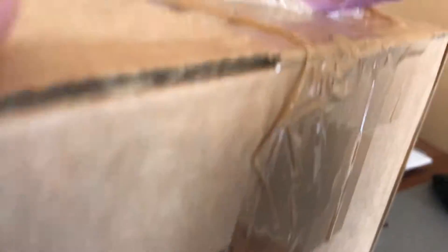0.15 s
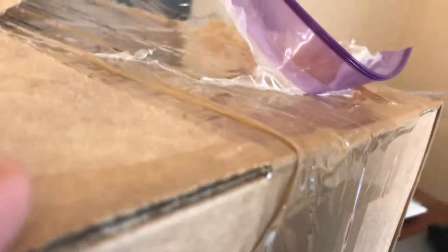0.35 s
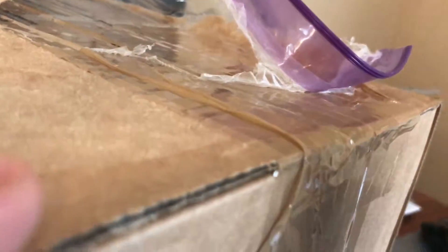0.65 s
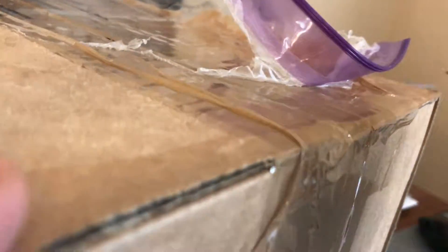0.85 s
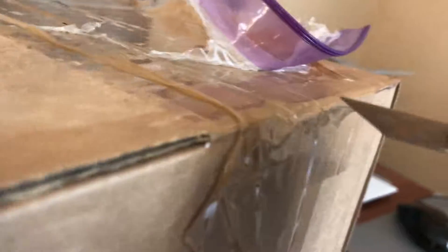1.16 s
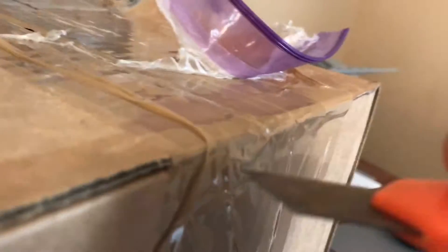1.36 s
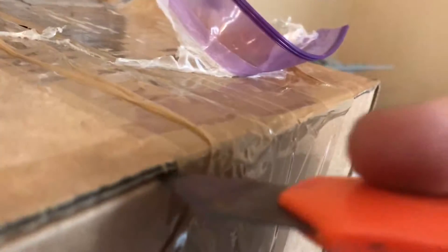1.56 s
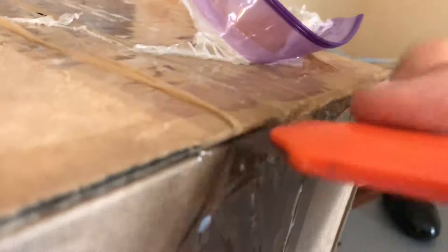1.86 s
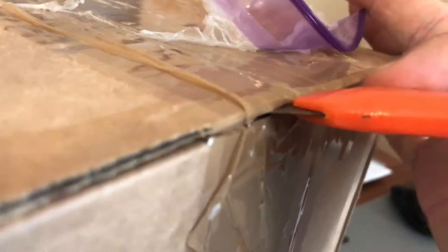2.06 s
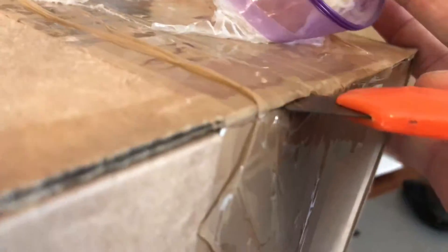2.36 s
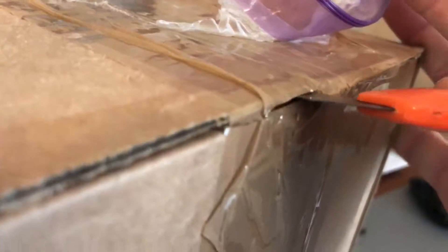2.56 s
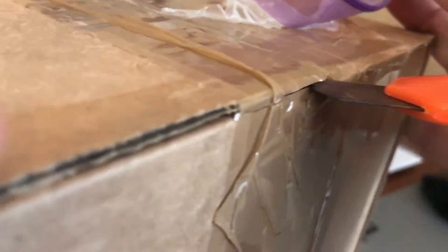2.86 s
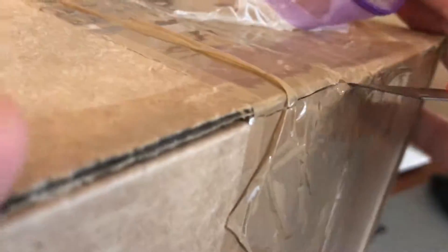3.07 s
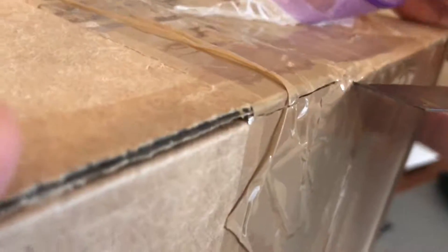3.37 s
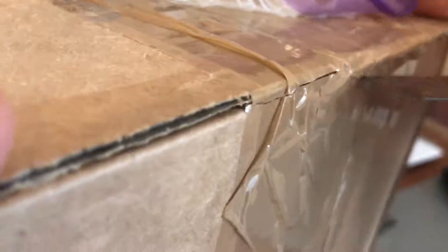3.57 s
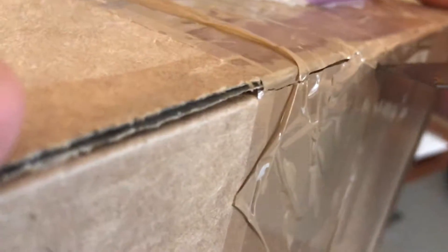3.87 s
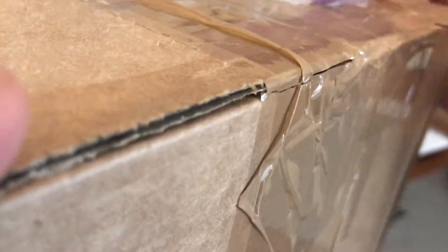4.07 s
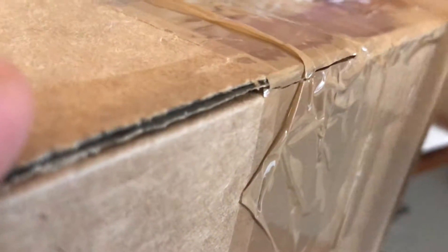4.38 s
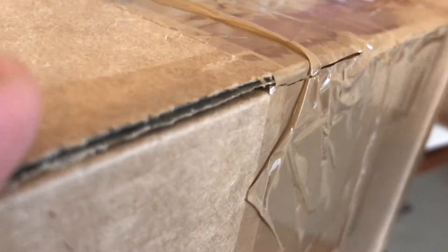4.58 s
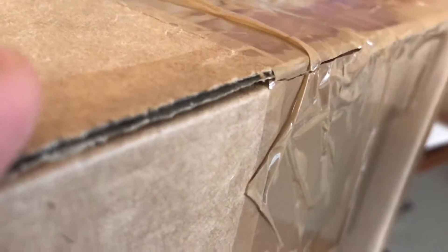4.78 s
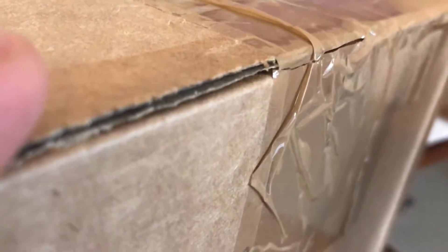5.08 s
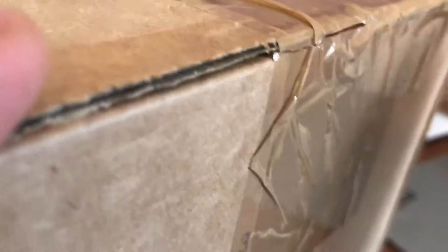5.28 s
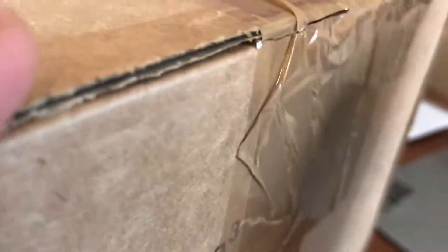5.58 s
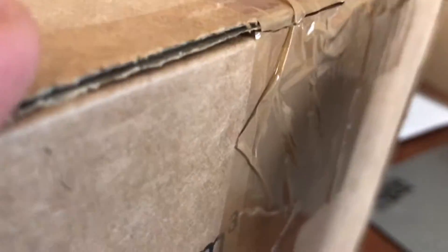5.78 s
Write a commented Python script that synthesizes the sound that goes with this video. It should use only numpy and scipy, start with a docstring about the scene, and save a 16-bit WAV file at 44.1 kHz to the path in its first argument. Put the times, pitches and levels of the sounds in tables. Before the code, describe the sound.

Close to the microphone in a small room, faint handling and light knife clicks lead into a blade slitting tape on a cardboard box. The cut goes in uneven scraping strokes, with short rips and low knocks, up to a loud crack. The blade retracts with a brief plastic rattle and a sharp click. Finally fingers rub the box and pick at the tape, making crackles and dull bumps.

```python
"""A utility knife slits the packing tape on a cardboard box, close by in a small room.
First the plastic slider clicks, each impact ringing the modes of the handle. The blade then rubs, rips
and snaps through the film by stick-slip friction, and the panels and the enclosed air resonate with it.
Near 4.4 s the slider scrapes back and strikes its stop. Last, a hand shifts the box and picks at the tape."""
import sys
import numpy as np
from scipy import signal
from scipy.fft import rfft, irfft
from scipy.io import wavfile
from scipy.ndimage import uniform_filter1d

SR = 44100
rng = np.random.default_rng(int(sys.argv[2]) if len(sys.argv) > 2 else 0)


def unload_audio(sound):
    """Save the sound as a 16-bit wav file, at the path given as the first command line argument."""
    columns = np.transpose(np.atleast_2d(sound))
    # keep every value between -1 and 1, then stretch to whole-number steps
    steps = np.round(np.clip(columns, -1, 1) * 32767)
    wavfile.write(sys.argv[1], SR, steps.astype(np.int16))


N = 261513
T = np.arange(N) / SR

# Normal modes. Each row: frequency in Hz, bandwidth in Hz, relative level in dB.
CAVITY_MODES = [(125.75, 6.04, 7), (225, 33, -9), (254, 34, -5.5), (287, 20, 1), (359, 26, -19)]  # air inside the box
PANEL_MODES = [(264.4, 46, 5), (354.5, 45, 5), (490, 130, -5.5), (578.4, 119, 3.5), (686, 186, -0.5),
               (864, 100, 0), (1050, 43, 2), (1112, 137, -1.5), (1332, 66, -2.5), (1544, 168, -0.5),
               (1860, 100, -10.5), (2160, 150, -7), (2286, 73, -18.5), (3050, 1500, -14.5)]  # cardboard panels
HANDLE_MODES = [(1307, 350, -14.5), (1723, 900, 1), (2105, 290, -1), (2580, 130, -4.5), (3574, 180, 3),
                (3710, 540, -9.5), (4305, 420, 1), (6270, 2600, -6.5), (6470, 750, -8), (7820, 730, -7.5),
                (9250, 510, -5), (11600, 720, -17.5), (11880, 880, -11)]  # hollow plastic handle
CATCH_MODES = [(2210, 310, -7), (3510, 210, -5.5), (3790, 440, -1), (4590, 210, 2), (5040, 300, 1.5),
               (5754, 160, 8.5), (6330, 200, -3), (7200, 200, -4), (7850, 150, -21), (9800, 120, -10.5),
               (11400, 280, -6), (12220, 240, -11), (13500, 220, -9), (14620, 300, -16)]  # spring catch of the slider
# Spectrum of breaking film. Each row: frequency in Hz, relative level in dB.
FILM_SPECTRUM = [(300, -12), (900, 3.5), (1600, 4), (2800, 1.5), (4200, 1), (6000, 1.5), (8000, -1),
                 (11000, -1.5), (16000, -4.5)]


def ripping(falloff_db_per_octave=5):
    """Fracture: the film tears in a dense run of slips that swells with the pull and drives the panels."""
    # Each row: start, swell and fade in seconds, film and panel levels in dB, favoured frequency in Hz.
    rips = [(1.785, 0.025, 0.014, -49, -48, 1040), (1.936, 0.0042, 0.043, -34.5, -37, 1000),
            (1.958, 0.019, 0.022, -52, -39.5, 593), (3.653, 0.0042, 0.0063, -36, -24.5, 553),
            (3.711, 0.0041, 0.0065, -42.5, -33, 640), (3.718, .03, 0.017, -43.5, -50, 440),
            (5.037, 0.025, 0.048, -55, -52.5, 930), (5.153, 0.015, 0.034, -49.5, -51.5, 660),
            (5.447, 0.016, 0.019, -40, -36, 794), (5.551, 0.033, 0.017, -46, -50, 1080),
            (5.636, 0.0044, 0.02, -46, -44.5, 605), (5.684, 0.0046, 0.036, -35, -39, 1100),
            (5.708, 0.028, 0.02, -52, -46, 810)]
    out = np.zeros(N)
    for start, swell, fade, film_db, panel_db, spot_hz in rips:
        n = int((swell + fade) * SR)
        pull = np.interp(T[:n], [0, swell, swell + fade], [.4, 1.25, .2])
        tear = slips(n, rate=12000, spread_db=4.5) * pull * undb(2.6 * walk(n, rate=240))
        tear = np.pad(tear, (0, SR // 10))
        fill = np.sqrt(n / len(tear))  # the levels hold for the run, not for its ring-out
        # a stiff edge favours the high panel modes, a slack face the low ones
        modes = [(hz, width, db - falloff_db_per_octave * abs(np.log2(hz / spot_hz)))
                 for hz, width, db in PANEL_MODES]
        panel = unit(ring(tear, touched(modes, spread_db=2.0, detune=0.055)))
        film = unit(colour(taut(tear), FILM_SPECTRUM))
        add(out, start, fill * (film * undb(film_db) + panel * undb(panel_db)))
    return out


def snapping():
    """Sudden release of tension: the tape parts with a bright crack, and the panel under it knocks."""
    # Each row: start in seconds, film level in dB, decay time in seconds, panel level in dB.
    snaps = [(0.69, -84, 0.011, -62), (1.1152, -57, 0.00028, -78), (1.176, -76, 0.0044, -60),
             (1.2038, -52.5, 0.0053, -49.5), (1.731, -55, 0.0017, -66), (1.9689, -36.5, 0.0091, -45),
             (2.0489, -37, 0.0015, -39.5), (2.0617, -38.5, 0.0005, -44), (2.3556, -44, 0.0059, -45),
             (3.336, -60.5, 0.0006, -74), (3.4897, -59.5, 0.0032, -54), (3.6031, -35, 0.0023, -44.5),
             (3.661, -23, 0.0037, -37.5), (3.7543, -40, 0.0026, -38), (3.766, -43.5, 0.0018, -60),
             (3.8927, -42.5, 0.0024, -54), (3.943, -48.5, 0.0045, -53), (4.0493, -42.5, 0.0031, -65.5),
             (4.0634, -40.5, 0.005, -49), (4.0842, -39, 0.0011, -47.5), (4.9291, -60, 0.0023, -76.5),
             (5.0136, -52.5, 0.0067, -52.5), (5.062, -44, 0.0083, -51), (5.0743, -41.5, 0.0052, -47),
             (5.39, -54, 0.0017, -50.5), (5.4673, -39.5, 0.0058, -42.5), (5.6634, -43.5, 0.0076, -42),
             (5.6883, -46, 0.0072, -28.5), (5.84, -53, 0.0034, -44)]
    out = np.zeros(N)
    for start, film_db, decay, panel_db in snaps:
        snap = crack(decay)
        film = impulse(colour(taut(snap), FILM_SPECTRUM, brightness_db(decay)))
        panel = impulse(ring(snap, PANEL_MODES))
        add(out, start, film * undb(film_db) + panel * undb(panel_db))
    return out


def taut(x):
    """Membrane resonance: tape stretched over the gap of the flaps adds its own short ring."""
    # Each row: frequency in Hz, bandwidth in Hz, relative level in dB.
    tape_modes = [(1840, 31, 2), (2397, 90, -2.5), (3200, 290, -10), (4075, 460, -5), (5280, 160, -15.5),
                  (5830, 130, -9), (6240, 230, -4.5), (6950, 270, -12), (8000, 100, -12),
                  (9060, 720, -11.5), (11160, 200, -1)]
    return x + undb(-0.5) * ring(x, tape_modes)


def knife_clacks(catch_db=-12, blade_db=-18):
    """Impact excitation: clicks and knocks from slider and blade ring the handle, catch and blade."""
    # Each row: start in seconds, handle level in dB, decay time in seconds.
    clacks = [(0.5555, -55, 0.0072), (0.569, -51.5, 0.0055), (0.591, -56, 0.0062), (0.886, -55, 0.00014),
              (0.9615, -51, 0.012), (1.6523, -40, 0.0016), (1.658, -34.5, 0.006), (1.719, -35, 0.0017),
              (3.6612, -25.5, 0.0017), (4.1119, -49.5, 0.0084), (4.2875, -44, 0.0042),
              (4.3056, -38.5, 0.0028), (4.3705, -37.5, 0.0049), (4.383, -45.5, 0.0041),
              (4.4067, -35, 0.002), (4.4203, -46, 0.0014), (4.4328, -41, 0.0056), (4.494, -43.5, 0.0053),
              (4.607, -47, 0.0096), (4.6371, -42, 0.0051), (4.6553, -42.5, 0.0031), (4.6984, -43, 0.0001),
              (4.7061, -43.5, 0.0015), (4.711, -37.5, 0.0052), (5.419, -51.5, 0.0012),
              (5.5487, -51, 0.0018), (5.8545, -36, 0.0014), (5.878, -35, 0.00092), (5.912, -49, 0.0016)]
    # Modes of the steel blade. Each row: frequency in Hz, bandwidth in Hz, relative level in dB.
    blade_modes = [(1806, 53, 2), (1810, 46, -12.5), (3306, 88, 7), (3696, 22, 0.5), (7400, 90, -12),
                   (8440, 110, -14), (10700, 150, -20.5)]
    # Touches on the blade itself. Each row: start in seconds, level in dB.
    pings = [(0.9605, -48.5), (1.719, -44), (1.8085, -47), (4.2889, -44), (4.5549, -48.5)]
    radiation = [(300, -43), (750, 0.5), (1200, -5.5), (11000, -2), (16000, 1)]  # too small for bass
    out = np.zeros(N)
    for start, db, decay in clacks:
        click = crack(decay)
        shell = impulse(ring(click, touched(HANDLE_MODES, spread_db=2.5, detune=0.036)))
        catch = impulse(ring(click, CATCH_MODES))
        blade = impulse(ring(click, blade_modes))
        handle = shell + undb(-12) * impulse(click) + undb(catch_db) * catch
        handle = impulse(colour(handle, radiation, tilt_db=brightness_db(decay) - 1))
        add(out, start, undb(db) * (handle + undb(blade_db) * blade))
    for start, db in pings:
        add(out, start, undb(db) * impulse(ring(crack(decay=0.0016), blade_modes)))
    return out


def slider():
    """Friction and rebound: the slider scrapes back along its track, and its catch bounces on the stop."""
    # The scrape. Each row: time in seconds, level in dB.
    track = [(4.27, -85.5), (4.31, -62.5), (4.35, -59), (4.419, -48), (4.53, -65), (4.72, -59), (4.83, -76)]
    # Hits on the stop. Each row: start in seconds, level in dB, decay time in seconds.
    bounces = [(4.3999, -24.5, 0.00037), (4.4015, -22, 0.00031), (4.4032, -32, 0.0009)]
    scrape_db = np.interp(T, *np.transpose(track), left=-140, right=-140)
    out = unit(ring(slips(N, rate=4800, spread_db=4.5), HANDLE_MODES)) * undb(scrape_db)
    for start, db, decay in bounces:
        click = crack(decay, rise=.0001)
        catch = impulse(ring(click, CATCH_MODES))
        contact = impulse(colour(click, FILM_SPECTRUM))
        add(out, start, undb(db) * (catch + undb(-24.5) * contact))
    return out


def thumping(boom_db_per_octave=10.5):
    """Damped oscillation: a released wall swings for a few cycles and excites the enclosed air."""
    # Each row: start in seconds, peak level of the flex in dB, its frequency in Hz.
    thumps = [(0.255, -44.5, 82.5), (1.208, -34, 92), (1.446, -50, 79), (1.807, -34.5, 109),
              (1.983, -24, 87.4), (2.011, -32, 88.5), (2.242, -37, 92), (2.336, -37.5, 129),
              (2.365, -35.5, 139), (2.67, -38.5, 117), (2.758, -40, 129), (2.944, -44.5, 94),
              (3.164, -35.5, 121), (3.195, -36, 99), (3.659, -21, 270), (3.661, -20.5, 105),
              (3.755, -32.5, 269), (3.759, -29, 109), (4.04, -42.5, 120), (4.079, -44.5, 98),
              (5.017, -38, 110), (5.187, -51, 122), (5.771, -48, 121), (5.433, -35, 122), (5.479, -40, 132),
              (5.693, -22, 87)]
    out = np.zeros(N)
    for start, db, hz in thumps:
        cycles = hz * T[:SR // 2]
        flex = np.sin(2 * np.pi * cycles) * (1 - np.exp(-cycles / 2.0)) * np.exp(-cycles / 0.81)
        # a stiffer wall lets go faster and reaches the higher modes
        boom = ring(np.exp(-cycles / 0.45), CAVITY_MODES)
        boom_db = -12 + boom_db_per_octave * np.log2(hz / CAVITY_MODES[0][0])
        thump = flex / np.abs(flex).max() + undb(boom_db) * boom / np.abs(boom).max()
        add(out, start, undb(db) * thump)
    return out


def effort(peak_fraction=0.42, arch_exponent=0.29, release_s=0.012):
    """Incoherent sources add in power: arched strokes over the grip give hiss, rasp and boom gains."""
    # Pressure of the hands on the box, heard as loudness. Each row: time in seconds, level in dB.
    grip = [(0.0, -81.5), (0.47, -76), (1.05, -86.5), (1.3, -75), (1.6, -77.5), (1.9, -67), (2.1, -65.5),
            (2.55, -68), (2.8, -68.5), (3.28, -74), (3.85, -62), (4.1, -67), (4.2, -88), (4.89, -93),
            (5.05, -84), (5.33, -70.5), (5.55, -62), (5.93, -63.5)]
    # Strokes of blade or fingers. Each row: start and length in seconds, hiss, rasp and boom in dB.
    strokes = [(0.08, 0.088, -69.5, -75, -82), (0.219, 0.24, -58, -68.5, -63.5),
               (0.587, 0.12, -57.5, -88, -74), (0.707, 0.14, -63, -84, -83), (0.848, 0.12, -59.5, -78, -80),
               (1.092, 0.15, -65.5, -86, -63), (1.194, 0.094, -56.5, -61.5, -59),
               (1.371, 0.053, -57.5, -66.5, -61), (1.633, 0.079, -54, -59.5, -63),
               (1.724, 0.095, -47, -53, -62), (1.997, 0.16, -57, -59, -46.5),
               (2.173, 0.11, -61.5, -58, -65), (2.272, 0.11, -54, -54, -51.5),
               (2.38, 0.07, -62, -62.5, -60), (2.566, 0.14, -62, -55.5, -69),
               (2.738, 0.022, -66, -54.5, -50), (2.833, 0.093, -61.5, -67, -76),
               (2.967, 0.1, -60.5, -48.5, -57), (3.082, 0.11, -58.5, -50.5, -61),
               (3.295, 0.035, -60, -61, -69), (3.418, 0.11, -85, -61, -56.5),
               (3.528, 0.047, -65, -62.5, -70), (3.66, 0.14, -56, -50.5, -42.5),
               (3.868, 0.068, -62, -61, -59), (4.012, 0.083, -58, -53.5, -42.5),
               (4.109, 0.71, -64, -70.5, -88.5), (4.917, 0.19, -66, -66, -73), (5.018, 0.14, -77, -57, -48),
               (5.142, 0.089, -68.5, -61.5, -43), (5.236, 0.057, -66.5, -80, -52),
               (5.368, 0.14, -77, -58.5, -48), (5.546, 0.081, -57.5, -53.5, -44),
               (5.7, 0.135, -54, -56, -44), (5.84, 0.08, -62, -53.5, -62)]
    rest_db = np.array([[0.5], [0], [9.5]])  # hiss, rasp and boom relative to the grip
    power = undb(np.interp(T, *np.transpose(grip)) + rest_db) ** 2
    for start, length, *levels_db in strokes:
        ramp = np.interp(T, start + length * np.array([0, peak_fraction, 1]), [0, 1, 0])
        arch = np.sin(np.pi / 2 * ramp) ** arch_exponent
        power += np.outer(undb(levels_db), arch) ** 2
    pole = np.exp(-2 / (release_s * SR))
    return np.sqrt(signal.lfilter([1 - pole], [1, -pole], power))


def sliding(hiss_gain, rasp_gain):
    """Sliding friction: steel and skin raise a hiss with lone ticks on the tape, a rasp in the panels."""
    # Each row: frequency in Hz, relative level in dB.
    hiss_spectrum = [(500, -7.5), (1500, 1), (2800, -2), (4500, -2.5), (7000, -2), (10500, -3),
                     (16000, -3.5)]
    grip_db = 1.3 * walk(N, rate=60)
    hiss = unit(shifting(colour(taut(slips(N, rate=9000, spread_db=2.5)), hiss_spectrum)))
    ticks = unit(colour(taut(slips(N, rate=160, spread_db=3.5)), hiss_spectrum, tilt_db=2))
    grit = slips(N, rate=3000, spread_db=1.5)
    scratch = colour(grit, [(500, -29), (1500, -0.5), (4500, 5.5), (16000, -8.5)])
    rasp = unit(ring(grit, PANEL_MODES) + undb(-26.5) * scratch)
    return undb(grip_db) * ((hiss + undb(-8.5) * ticks) * hiss_gain + rasp * rasp_gain)


def holding(boom_gain, skin_cutoff_hz=154, sway_db=-2):
    """Forced vibration: soft nudges of the hand sway the walls and keep the enclosed air booming."""
    # Modes of whole walls. Each row: frequency in Hz, bandwidth in Hz, relative level in dB.
    wall_modes = [(51.7, 16, -8), (80.3, 3.6, -7), (90.2, 5.2, -2.5)]
    push = butter(slips(N, rate=70, spread_db=0), skin_cutoff_hz)
    return boom_gain * (unit(ring(push, CAVITY_MODES)) + undb(sway_db) * unit(ring(push, wall_modes)))


def whirring():
    """Narrow-band noise: faint thin whirrs and rings come and go."""
    # Each row: start and end in seconds, frequency and bandwidth in Hz, level in dB.
    whirrs = [(0.073, 0.188, 4530, 290, -77), (0.866, 1, 3480, 110, -69), (0.907, 0.944, 3580, 250, -56.5),
              (1.271, 1.586, 1120, 131, -73.5), (1.453, 1.59, 4640, 200, -82), (1.79, 1.86, 3500, 200, -65),
              (2.865, 2.936, 2770, 900, -61), (2.96, 3.21, 4500, 300, -73), (2.963, 3.207, 6740, 250, -78)]
    out = np.zeros(N)
    for start, end, hz, width, db in whirrs:
        gate = np.clip(np.minimum(T - start, end - T) / 0.01, 0, 1)
        out += gate * undb(db) * unit(ring(rng.standard_normal(N), [(hz, width, 0)]))
    return out


def room(x, low_t60=0.34, high_t60=0.27, crossover_hz=2500, wet_db=-17):
    """Reverberation: the desk and near walls return a short tail whose treble dies first."""
    t = T[:SR // 2]
    noise = rng.standard_normal(len(t))
    low = butter(noise, crossover_hz) * 1000 ** (-t / low_t60)
    high = butter(noise, crossover_hz, "high") * 1000 ** (-t / high_t60)
    early = (1 - np.exp(-t / .003)) * (1 + 2.5 * np.exp(-t / .009))
    tail = colour((low + high) * early, [(100, 1.5), (6000, -0.5), (16000, -11.5)])
    return x + undb(wet_db) * signal.fftconvolve(x, tail / np.sqrt(np.sum(tail ** 2)))[:N]


def room_air():
    """Stationary noise: the faint air of the room, strongest in the bass."""
    # Each row: frequency in Hz, relative level in dB.
    air_spectrum = [(20, -3), (55, 7), (130, -2.5), (280, -1), (500, -11.5), (1000, -16), (2500, -21),
                    (6000, -23.5), (16000, -33)]
    return unit(colour(rng.standard_normal(N), air_spectrum)) * undb(-67)


def slips(n, rate, spread_db):
    """Stick-slip: tiny random releases, on average rate a second, a few far larger than the rest."""
    happens = rng.random(n) < rate / SR
    strength = np.minimum(rng.exponential(size=n), 5)
    return unit(happens * rng.standard_normal(n) * undb(spread_db * strength) + 1e-9)


def crack(decay, rise=0.00036, size=6144):
    """Transient excitation: a contact breaks in an exponentially fading burst of chatter."""
    t = T[:size]
    return rng.standard_normal(size) * (1 - np.exp(-t / rise)) * np.exp(-t / max(decay, 1e-4))


def brightness_db(decay, neutral_s=0.0022):
    """Time-frequency reciprocity: a shorter click is brighter; gives its tilt in dB an octave."""
    return 1.05 * np.log2(neutral_s / max(decay, 1e-4))


def ring(x, modes):
    """Modal superposition: x drives the resonances; a second, wider pass darkens the valleys between."""
    out = 0
    for hz, width, db in modes:
        mode = signal.lfilter(*signal.iirpeak(hz, hz / width, fs=SR), x)
        mode = signal.lfilter(*signal.iirpeak(hz, max(hz / width / 5, 1), fs=SR), mode)
        out = out + undb(db) * mode
    return out


def touched(modes, spread_db, detune):
    """Point of excitation: each contact lands elsewhere, so the modes vary in strength and pitch."""
    chance = rng.standard_normal((len(modes), 2))
    return [(hz * np.exp(detune * shift), width, db + spread_db * boost)
            for (hz, width, db), (shift, boost) in zip(modes, chance)]


def shifting(x, depth_db=2, rate=11, count=9):
    """Amplitude modulation: as the contact travels, its noise bands swell and fade independently."""
    spectrum, hz = rfft(x), np.fft.rfftfreq(N, 1 / SR)
    centres = np.geomspace(1000, 15000, count)
    bands = (irfft(spectrum * np.interp(hz, centres, weights), N) for weights in np.eye(count))
    return sum(band * undb(depth_db * walk(N, rate)) for band in bands)


def colour(x, points, tilt_db=0, size=2048):
    """Minimum-phase filter through (Hz, dB) points, tilted by tilt_db an octave from 1 to 16 kHz."""
    hz, db = np.transpose(points)
    octave = np.log2(np.maximum(np.fft.rfftfreq(size, 1 / SR), 1))
    slope = np.clip(octave - np.log2(4000), -2, 2)
    response = undb(np.interp(octave, np.log2(hz), db) + tilt_db * slope)
    cepstrum = irfft(np.log(response))
    cepstrum[1:size // 2] *= 2  # folding the cepstrum makes the filter causal
    cepstrum[size // 2 + 1:] = 0
    return signal.fftconvolve(x, irfft(np.exp(rfft(cepstrum))))[:len(x)]


def butter(x, hz, kind="low", order=2):
    """Maximally flat low-pass or high-pass filter."""
    return signal.sosfilt(signal.butter(order, hz, kind, fs=SR, output="sos"), x)


def walk(n, rate):
    """Smoothed noise of rms 1 that changes about rate times a second."""
    return unit(uniform_filter1d(rng.standard_normal(n), max(int(SR / rate), 1)))


def undb(db):
    """Decibels to gain."""
    return 10 ** (np.asarray(db) / 20)


def unit(x):
    """Scale to an rms of 1."""
    return x / np.sqrt(np.mean(x ** 2))


def impulse(x):
    """Scale a click to the energy of 10 ms at rms 1."""
    return x * np.sqrt(SR / 100 / np.sum(x ** 2))


def add(track, start, x):
    """Mix x into the track at start seconds."""
    i = max(int(start * SR), 0)
    track[i:i + len(x)] += x[:max(N - i, 0)]


def scene():
    """Superposition: tape, knife and box sound in the room, over faint air noise and thin whirrs."""
    hiss_gain, rasp_gain, boom_gain = effort()
    handling = sliding(hiss_gain, rasp_gain) + holding(boom_gain)
    desk = handling + ripping() + snapping() + knife_clacks() + slider() + thumping()
    air = room_air()
    return (room(desk) + air + whirring())[None]


def record(dry, bottom_hz=44, top_hz=16100):
    """Band limiting: the microphone sheds the deepest bass, and the top is cut steeply."""
    thin = butter(dry, bottom_hz, "high", order=3)
    return signal.sosfilt(signal.ellip(8, .2, 70, top_hz, fs=SR, output="sos"), thin)


dry = scene()
out = record(dry)
unload_audio(out)
```